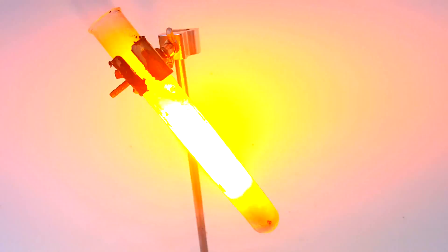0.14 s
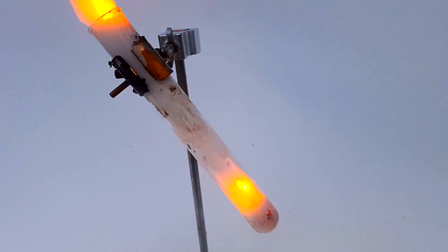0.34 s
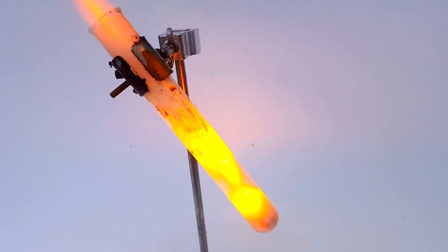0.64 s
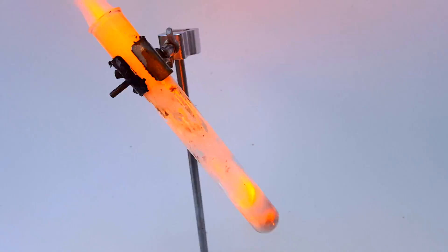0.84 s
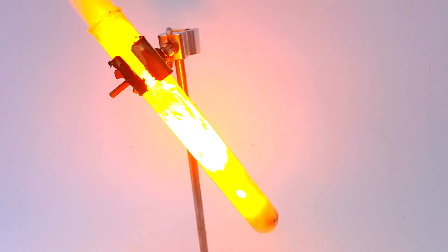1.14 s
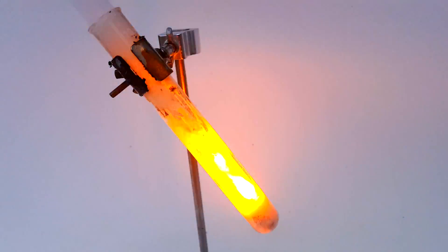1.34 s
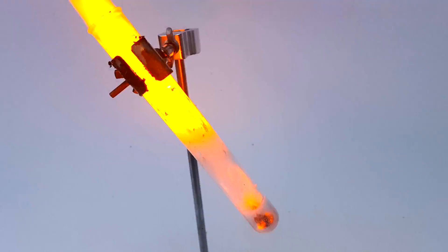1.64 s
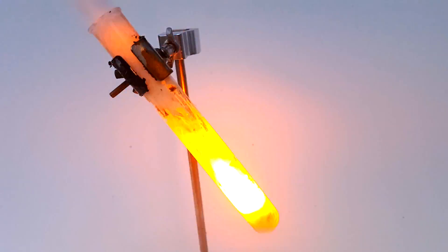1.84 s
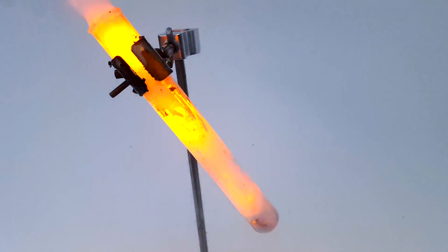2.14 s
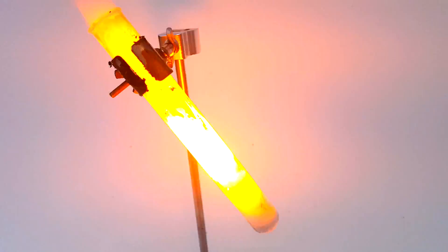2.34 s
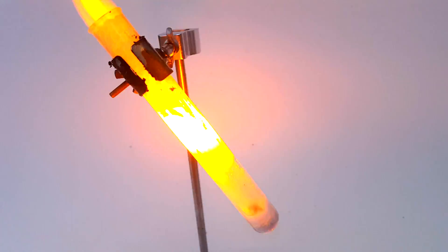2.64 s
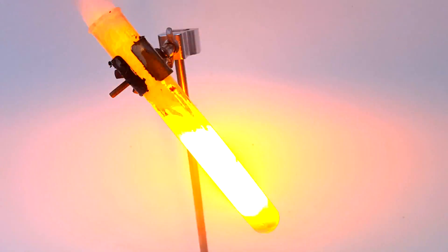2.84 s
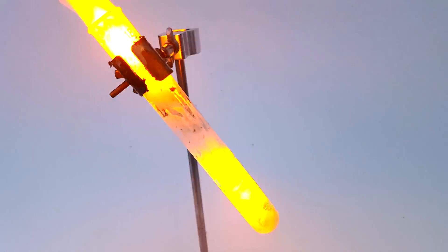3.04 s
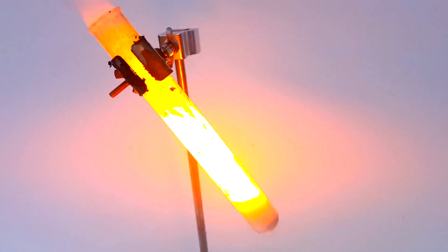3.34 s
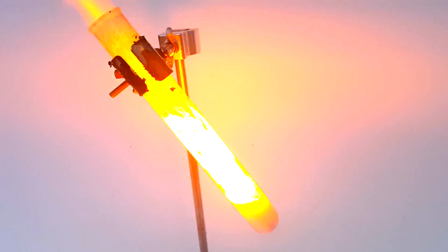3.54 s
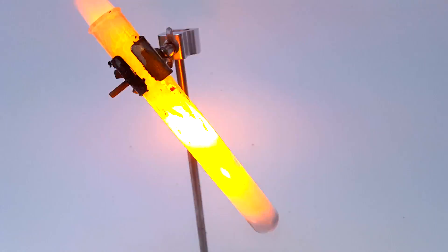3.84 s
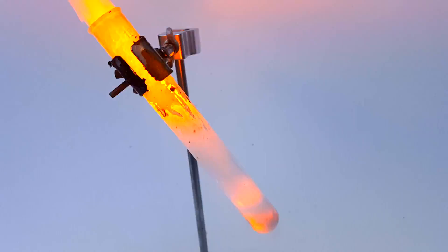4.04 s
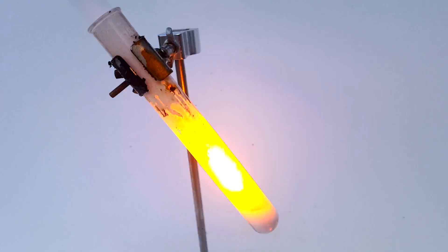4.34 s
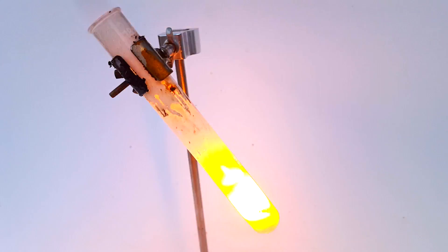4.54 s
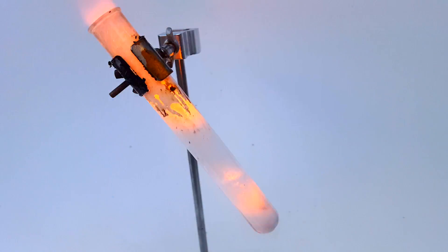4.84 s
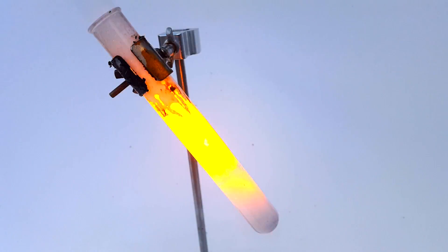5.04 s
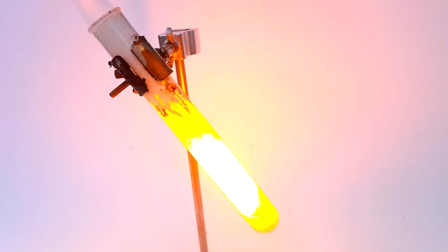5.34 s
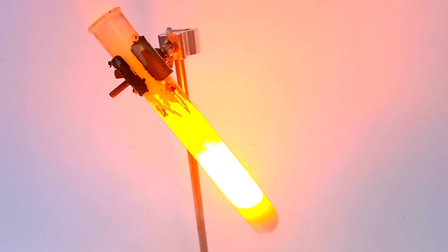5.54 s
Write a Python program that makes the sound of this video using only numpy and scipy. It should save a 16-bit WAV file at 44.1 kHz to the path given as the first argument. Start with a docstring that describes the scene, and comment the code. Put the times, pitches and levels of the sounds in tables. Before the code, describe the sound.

In a fume cupboard with a faint, steady fan, a flame rushes through a glass tube, hissing at the mouth and whistling with an unsteady pitch. Irregular pops and brief whooshes break through as it flares. Later the hiss thins and the tone drops a little, before a quick cluster of pops and one more ringing surge. The sound is close and in stereo, with very short echoes.

```python
"""A sweet burns in molten oxidiser at the closed end of a glass tube in a fume cupboard.
From the start a fan rumbles, the flame's roar rings the gas column (odd modes, higher when the gas is
hot) and the jet hisses at the mouth. The flame chokes and surges; flare-ups pop from 0.3 s on.
Near 4 s the burn weakens and the pitch sinks; at 5.6 s come sharp pops and a last swell of the ring.
A spaced microphone pair hears it all, with echoes from a close hard surface."""
import sys
import numpy as np
from scipy import signal
from scipy.fft import rfft, irfft, next_fast_len
from scipy.io import wavfile
from scipy.ndimage import uniform_filter1d

SR = 44100
rng = np.random.default_rng(int(sys.argv[2]) if len(sys.argv) > 2 else 0)


def transcribe(signal):
    """Save signal, clipped to [-1, 1], as a 16-bit WAV file at the path in sys.argv[1]."""
    frames = np.atleast_2d(signal).T
    limited = np.clip(frames, -1, 1)
    pcm = np.round(limited * 32767).astype(np.int16)
    wavfile.write(sys.argv[1], SR, pcm)


N = 250929
T = np.arange(N) / SR


def gain_of(db):
    """Decibels to amplitude."""
    return 10 ** (np.asarray(db) / 20)


def unit_rms(x):
    """Scales to rms 1."""
    return x / np.sqrt(np.mean(x ** 2) + 1e-20)


def at_hz(points, hz):
    """Interpolates on a log-frequency axis."""
    f, value = np.transpose(points)
    return np.interp(np.log(hz + 1), np.log(f + 1), value)


def curve(rows, column):
    """One table column at every sample."""
    return np.interp(T, np.transpose(rows)[0], np.transpose(rows)[column])


def coloured(spectrum, channels):
    """Noise of the given spectrum, rms 1."""
    size = next_fast_len(N)
    white = rfft(rng.standard_normal((channels, size)))
    shape = gain_of(at_hz(spectrum, np.fft.rfftfreq(size, 1 / SR)))
    return unit_rms(irfft(white * shape, size)[:, :N])


def wander(hz):
    """Random drift up to about hz, rms 1."""
    return unit_rms(signal.sosfilt(signal.butter(2, hz, fs=SR, output="sos"), rng.standard_normal(N)))


def flutter(hz):
    """Random flutter from about 10 Hz to hz, rms 1."""
    drift = wander(hz)
    return unit_rms(drift - uniform_filter1d(drift, size=3000))


def resonate(x, hz, width_hz):
    """Two unity-gain resonators in series; hz may vary."""
    turn = np.exp(2j * np.pi * np.cumsum(hz * np.ones(len(x))) / SR)
    pole = np.exp(-np.pi * width_hz / SR)
    for _ in range(2):
        x = 2 * (turn * signal.lfilter([1 - pole], [1, -pole], x / turn)).real
    return x


def band(x, hz, width_hz):
    """Resonance at rms 1."""
    return unit_rms(resonate(x, hz, width_hz))


def humps(rows, column, rise):
    """One hump per row, as high as the column; rise time in half-lengths."""
    out = np.zeros(N)
    for row in rows:
        peak_s, half_s = row[:2]
        near = abs(T - peak_s) < 2 * half_s
        u = (T[near] - peak_s) / half_s
        u = np.clip(np.where(u < 0, u / rise, u / (2 - rise)), -1, 1)
        out[near] += row[column] * np.cos(np.pi / 2 * u).clip(0) ** 1.4
    return out


def patchy(x, depth_db):
    """Random patches, about 700 Hz by 35 ms, swell and fade."""
    spectra = signal.stft(x, nperseg=512)[2]
    patches = uniform_filter1d(rng.standard_normal(spectra.shape[-2:]), size=8, axis=0)
    patches = unit_rms(uniform_filter1d(patches, size=6, axis=1))
    return signal.istft(spectra * gain_of(depth_db * patches), nperseg=512)[1][..., :N]


# Rumble spectrum. Each row: frequency in Hz, relative density in dB.
RUMBLE_SPECTRUM = [(20, -49), (48, -35), (62, -5.5), (110, 6), (170, 5), (210, 0), (290, -9), (450, -25),
                   (1200, -3.5), (4000, -84)]
# Fan tones. Each row: frequency in Hz, width in Hz, level in dB.
FAN_TONES = [(77.6, 2.8, -63), (175.2, 11, -60.5), (241.5, 18, -63.5)]
# Draught spectrum. Each row: frequency in Hz, relative density in dB.
DRAUGHT_SPECTRUM = [(300, -4.5), (800, 1.5), (1500, -3.5), (2500, 0.5), (5000, -16.5), (8500, -31),
                    (10500, -72), (15500, -49)]


def fan():
    """Extractor rumble, fuzzy tones and steady draught, nearly alike in both microphones."""
    rumble, *rumble_sides = coloured(RUMBLE_SPECTRUM, channels=3)
    tones = sum(gain_of(db) * band(rng.standard_normal(N), hz, width) for hz, width, db in FAN_TONES)
    rumble = unit_rms(rumble + 0.15 * np.array(rumble_sides))
    draught, *draught_sides = coloured(DRAUGHT_SPECTRUM, channels=3)
    draught = draught + 0.5 * np.array(draught_sides)
    return gain_of(-55.5) * rumble + tones + gain_of(-50) * draught


# Column pitch, set by gas heat. Each row: time in seconds, first mode in Hz.
COLUMN_PITCH = [(0.0, 1008), (0.04, 1025), (0.11, 980), (0.18, 1020), (0.25, 1046), (0.3, 955),
                (0.37, 1005), (0.42, 965), (0.47, 982), (0.55, 959), (0.6, 1007), (0.7, 1001), (0.77, 957),
                (0.89, 1067), (0.93, 959), (0.98, 1016), (1.04, 934), (1.09, 1006), (1.14, 1033),
                (1.19, 965), (1.27, 995.6), (1.4, 1000), (1.54, 1008), (1.65, 993), (1.76, 965),
                (1.82, 990), (1.85, 950), (1.95, 930), (2.01, 1069), (2.06, 1082), (2.11, 915), (2.17, 900),
                (2.23, 926), (2.26, 1027), (2.31, 1064), (2.36, 978), (2.45, 982.3), (2.55, 985),
                (2.62, 985), (2.69, 986), (2.79, 954), (2.92, 996.3), (3.04, 942), (3.09, 1009),
                (3.17, 898.4), (3.22, 967), (3.34, 1014), (3.5, 926), (3.58, 1009), (3.69, 919.3),
                (3.79, 1027), (3.87, 844), (3.9, 880), (3.94, 960), (4.03, 989), (4.12, 1000), (4.2, 1017),
                (4.29, 878), (4.34, 917), (4.4, 839), (4.5, 909.7), (4.75, 874.6), (4.82, 936),
                (4.85, 860.4), (4.91, 936.6), (4.96, 821.8), (5.09, 895), (5.23, 840.4), (5.37, 973),
                (5.42, 867), (5.48, 903), (5.56, 998), (5.61, 898), (5.69, 902)]


def first_mode(roar, sputter, shake):
    """The roar rings the column; the flame locks on and half whistles. Returns sound and pitch."""
    hz = curve(COLUMN_PITCH, column=1) * shake
    core = band(roar, hz, width_hz=88)
    skirt = gain_of(1) * band(roar, 0.945 * hz, width_hz=272)
    whistle = gain_of(0.2 + 3 * flutter(hz=40.3)) * unit_rms(np.sin(2 * np.pi * np.cumsum(hz) / SR))
    shoulder = gain_of(-11) * band(rng.standard_normal(N), hz=1125, width_hz=120)
    growl = gain_of(-25 + 2 * sputter) * band(roar, hz=300, width_hz=180)  # the flame's own
    return unit_rms(core + skirt + whistle + shoulder + growl), hz


def upper_modes(roar, first_hz, third_db):
    """Third and fifth column modes follow half of the first mode's relative pitch swing."""
    heat = (first_hz / np.median(first_hz)) ** 0.5
    third = gain_of(third_db + 2 * wander(hz=8.2)) * band(roar, 3114 * heat, width_hz=350)
    fifth = gain_of(-14.5 + 2 * wander(hz=7.5)) * band(roar, 5300 * heat, width_hz=280)
    return third + fifth


# Jet spectrum. Each row: frequency in Hz, relative density in dB.
JET_SPECTRUM = [(150, -10), (400, -4), (1300, 1.5), (1800, 2.5), (2500, 5), (4000, -0.5), (5800, -1),
                (7000, -3.5), (8500, 0), (10300, -11), (13000, -12), (15500, -16)]


def jet(sputter, jet_db):
    """Sputtering hiss at the mouth, plus separate hiss per channel; a slower jet is duller."""
    fizz = gain_of(1.1 * sputter + 0.25 * wander(hz=302))
    air = coloured(JET_SPECTRUM, channels=3)
    treble = signal.sosfilt(signal.butter(2, 7000, "high", fs=SR, output="sos"), air)
    speed_db = uniform_filter1d(jet_db, size=8000)
    air = air + treble * (gain_of(0.38 * (speed_db - speed_db.max())) - 1)
    hiss, *side_hiss = unit_rms(patchy(air * fizz, depth_db=2))
    return hiss, np.array(side_hiss)


# Burn strength. Each row: time in seconds, first mode in dB, hiss in dB, third mode in dB re hiss.
BURN = [(0, -31, -36, -4), (.5, -32.5, -37, -5), (1.1, -32.5, -35.5, -5), (1.5, -32.5, -36.5, -5),
        (1.9, -35, -36.5, -6.5), (2.3, -32, -35.5, -5), (2.9, -35, -37, -4), (3.35, -31, -35.5, -8.5),
        (3.8, -35.5, -42, -6.5), (4.15, -33.5, -40.5, -5), (4.3, -41, -44, -8), (4.8, -38.5, -42.5, -11.5),
        (5.25, -38, -44, -8.5), (5.56, -39.5, -40.5, -10), (5.62, -37, -50.5, -4), (5.69, -27.5, -54, 3)]


def flame():
    """One sputtering burn drives column, whooshes and jet. Returns tube sound and side hiss."""
    sputter = flutter(hz=34.2)
    shake = 1 + 0.012 * wander(hz=22)  # hot eddies shake the pitch
    roar = rng.standard_normal(N) * gain_of(0.74 * sputter)
    first, first_hz = first_mode(roar, sputter, shake)
    upper = upper_modes(roar, first_hz, third_db=curve(BURN, column=3))
    roar_fall_db, jet_fall_db = lulls()
    whoosh, roar_rise_db, jet_rise_db = surges(roar, shake)
    roar_db = curve(BURN, column=1) + roar_rise_db - roar_fall_db
    jet_db = curve(BURN, column=2) + jet_rise_db - jet_fall_db
    hiss, side_hiss = jet(sputter, jet_db)
    tube = gain_of(roar_db) * first + gain_of(jet_db) * (hiss + upper) + whoosh
    return tube, gain_of(jet_db) * side_hiss


# Chokes. Each row: centre in seconds, half-length in seconds, roar fall in dB, hiss fall in dB.
LULLS = [(.08, 0.042, 4, -0.5), (.34, 0.11, 4, 3.5), (1.19, 0.02, 1.5, 2.5), (1.26, 0.021, 11, 5.5),
         (1.32, 0.022, 2.5, 4), (1.585, 0.034, 3.5, 4.5), (1.67, 0.059, 0, 4.5), (1.755, 0.019, 1.5, 3.5),
         (1.85, 0.043, 0, 6), (1.945, 0.023, 4.5, 5.5), (2.19, 0.092, 2.5, 6.5), (2.36, 0.027, 5.5, 6.5),
         (2.44, 0.04, 7, 6.5), (2.64, 0.061, 3, 7), (2.75, 0.067, 3.5, 7), (3.02, 0.084, 2.5, 6),
         (3.21, 0.089, 4.5, 4), (3.425, 0.09, 5.5, 4.5), (3.53, 0.03, 8, 7.5), (3.715, 0.028, 5, 4),
         (3.935, 0.052, 5, 5), (4.255, 0.017, -4.5, 5.5), (4.425, 0.047, 1.5, 3), (4.9, 0.015, 4, 14),
         (5.125, 0.011, 7, -0.5), (5.141, 0.014, 8, 9), (5.33, 0.057, 2, 0), (5.49, 0.038, -0.5, 5),
         (5.6, 0.032, 1, 3.5)]


def lulls():
    """The flame chokes briefly. Returns the fall of roar and hiss in dB."""
    return humps(LULLS, column=2, rise=1.06), humps(LULLS, column=3, rise=1.06)


# Surges. Each row: peak in seconds, half-length in seconds, roar rise in dB, hiss rise in dB,
# whoosh level in dB, streak level in dB.
SURGES = [(0.287, 0.051, 5, 1, -39, -55), (0.765, 0.053, -0.5, 0, -55, -53),
          (1.017, 0.062, 1, -1.5, -55, -45), (1.143, 0.087, 3, -1, -41, -49),
          (1.287, 0.025, -0.5, 1, -48, -53), (1.625, 0.05, 2.5, 2.5, -50, -48),
          (1.97, 0.036, 0.5, 3, -48, -46.5), (2.004, 0.077, 3.5, -2, -64, -66),
          (2.123, 0.027, 3, 0.5, -40.5, -48), (2.396, 0.037, 3.5, 1, -53, -49),
          (2.558, 0.024, 6, -0.5, -43, -48), (2.666, 0.045, 2, 5, -42.5, -46.5),
          (2.803, 0.033, 4.5, 0, -62, -48), (3.115, 0.081, 4, -1.5, -41, -49),
          (3.478, 0.073, 4, 3, -41, -58), (3.585, 0.072, 2, 2.5, -60, -59),
          (3.668, 0.023, 8, 2.5, -40, -56), (3.858, 0.05, 4, 1, -40, -48), (4.001, 0.031, 3, 4, -42, -42),
          (4.161, 0.1, -2.5, 3.5, -48, -66), (4.364, 0.053, 4, 1, -38, -55),
          (4.494, 0.041, 7.5, 1, -51, -56), (4.621, 0.043, 9.5, 2, -35, -50),
          (4.954, 0.06, 5, -1.5, -43.5, -52), (5.172, 0.06, 6, 0, -37.5, -59),
          (5.387, 0.028, 6.5, 2, -48, -48), (5.415, 0.035, 3, -1, -39, -60), (5.55, 0.032, 5, -2, -60, -67),
          (5.627, 0.022, -5.5, 3.5, -54, -50.5), (5.675, 0.03, -0.5, 4, -51, -51)]


def surges(roar, shake):
    """Each surge whooshes with a rising streak. Returns sound and the rise of roar and hiss in dB."""
    lag_s, sink_hz_per_s, streak_hz_per_s, rise = 0.0024, 89, 33400, 0.91
    whooshes = [(s + lag_s, half_s, gain_of(db)) for s, half_s, _, _, db, _ in SURGES]
    whoosh_hz = (2848 - sink_hz_per_s * T) * shake  # cooler gas rings lower, more so as the flame dies
    whoosh = humps(whooshes, column=2, rise=0.79) * band(roar, whoosh_hz, width_hz=380)
    peaks_s = np.transpose(SURGES)[0]
    nearest_s = peaks_s[np.searchsorted((peaks_s[1:] + peaks_s[:-1]) / 2, T)]
    streaks = [(s, half_s, gain_of(db)) for s, half_s, *_, db in SURGES]
    streak_hz = np.clip(4000 + streak_hz_per_s * (T - nearest_s), 3000, 5600)
    streak = humps(streaks, column=2, rise=rise) * band(roar, streak_hz, width_hz=500)
    sound = (whoosh + streak) * gain_of(3 * wander(hz=251))  # grit
    return sound, humps(SURGES, column=2, rise=rise), humps(SURGES, column=3, rise=rise)


def struck(x, hz, width_hz):
    """Resonance scaled so a unit impulse peaks at 1."""
    return resonate(x, hz, width_hz) * np.e * SR / (2 * np.pi * width_hz)


# Flare-ups. Each row: start in seconds, ring level in dB, puff level in dB, snap level in dB.
FLARE_UPS = [(0.299, -23, -58, -38), (0.451, -23.5, -50, -35), (0.822, -40, -41, -38),
             (1.268, -24, -36, -36), (1.539, -19, -60, -40), (1.618, -25, -54, -32), (1.958, -34, -34, -45),
             (2.377, -26, -55, -42), (2.457, -22.5, -66, -41), (2.514, -24.5, -36, -34),
             (2.939, -28, -60, -29), (3.66, -33, -30.5, -34), (3.835, -30, -55, -30),
             (3.983, -26, -60, -29), (4.166, -22, -43, -38), (4.244, -29, -55, -31), (4.333, -28, -42, -28),
             (4.337, -23, -46, -22.5), (4.355, -33, -55, -33), (4.389, -24.5, -62, -37),
             (4.617, -27, -49, -32), (4.92, -25.5, -44, -33), (5.132, -43, -39, -30),
             (5.156, -30, -35, -38), (5.377, -28, -35, -19), (5.387, -41, -35, -40),
             (5.396, -22.5, -43, -38), (5.546, -26, -61, -42), (5.6235, -15.5, -60, -29),
             (5.6302, -16, -53, -26), (5.649, -19, -58, -27), (5.661, -27, -58, -23),
             (5.682, -27, -25, -34)]


def pops():
    """Each flare-up snaps, shoves the column into a brief ring and pushes out a low puff."""
    spit_s, puff_s = 0.004, 0.00037
    kicks, puffs, snaps = np.zeros((3, N))
    for start_s, *levels_db in FLARE_UPS:
        i = round(start_s * SR)
        kicks[i], puffs[i], snaps[i] = gain_of(levels_db)
    spit = gain_of(-16) * signal.lfilter([1], [1, -np.exp(-1 / (spit_s * SR))], snaps)
    snap = struck(snaps + spit * rng.standard_normal(N), hz=1200, width_hz=800)
    ring = struck(kicks, curve(COLUMN_PITCH, column=1), width_hz=160)
    shove = signal.windows.hann(17) / 8  # not instant
    u = np.arange(1500) / SR / puff_s
    puff = np.e * u * (2 - u) * np.exp(-u)
    return signal.oaconvolve(ring + snap, shove)[:N] + signal.oaconvolve(puffs, puff)[:N]


# Direct path and echoes. Each row: left delay in ms, right delay in ms, left gain, right gain.
PATHS = [(0, 0.223, 1.487, 1), (1.508, 1.544, 0.27, 0.27), (1.56, 1.68, -0.08, -0.069),
         (1.836, 1.941, 0.16, 0.33), (2.38, 2.44, 0.022, 0.15)]
# Separate hiss in each channel, widening the stereo image toward the top treble.
# Each row: frequency in Hz, gain in dB.
SIDE_HISS_GAIN = [(1000, -24), (3000, -10), (6000, -6), (10000, -4), (15000, 1)]
# Shading of the right microphone. Each row: frequency in Hz, gain in dB.
RIGHT_SHADING = [(600, 0.14), (1200, 0), (2200, -0.5), (4000, 1), (9000, -2.5), (12000, -0.5),
                 (15500, -9.5)]


def microphone_pair(tube, side_hiss):
    """Direct sound and close echoes arrive left first; each side gets its own hiss."""
    size = next_fast_len(N + SR // 10)
    hz = np.fft.rfftfreq(size, 1 / SR)
    left = sum(gain * np.exp(-2j * np.pi * hz * ms / 1000) for ms, _, gain, _ in PATHS)
    right = sum(gain * np.exp(-2j * np.pi * hz * ms / 1000) for _, ms, _, gain in PATHS)
    heard = rfft(tube, size) * np.array([left, right])
    heard += rfft(side_hiss, size) * gain_of(at_hz(SIDE_HISS_GAIN, hz))
    heard[1] *= gain_of(at_hz(RIGHT_SHADING, hz))
    return irfft(heard, size)[:, :N]


# Cupboard decay. Each row: frequency in Hz, T60 in seconds.
CUPBOARD_T60 = [(200, 0.14), (1000, 0.12), (4000, 0.077), (12000, 0.03)]


def cupboard(tube):
    """Short diffuse stereo tail; treble dies first."""
    hz, t, spectra = signal.stft(rng.standard_normal((2, SR // 2)), SR, nperseg=256)
    decay = gain_of(-60 * t / at_hz(CUPBOARD_T60, hz)[:, None])
    tail = signal.istft(spectra * decay, SR, nperseg=256)[1]
    tail[:, :130] = 0  # nothing before the first walls
    return signal.fftconvolve(tube[None], tail / np.linalg.norm(tail[0]), axes=1)[:, :N]


def scene():
    """The tube, its echoes and the cupboard tail, over the fan."""
    burn, side_hiss = flame()
    tube = burn + pops()
    return microphone_pair(tube, side_hiss) + gain_of(-21) * cupboard(tube) + fan()


def record(dry):
    """Microphone bass roll-off, then the recorder's band limit."""
    low_hz, high_hz = 48, 15700
    thin = signal.sosfilt(signal.butter(3, low_hz, "high", fs=SR, output="sos"), dry)
    lowpass = signal.firwin(1023, high_hz, window=("kaiser", 9), fs=SR)
    return signal.oaconvolve(thin, lowpass[None], "same")


dry = scene()
out = record(dry)
transcribe(out)
```